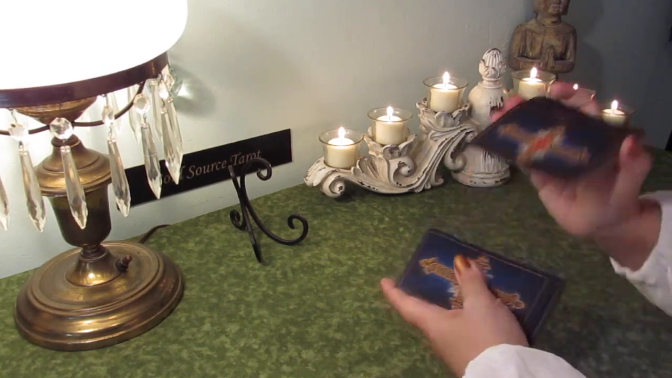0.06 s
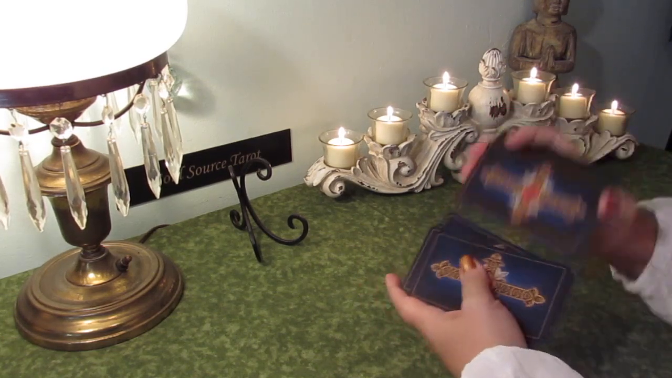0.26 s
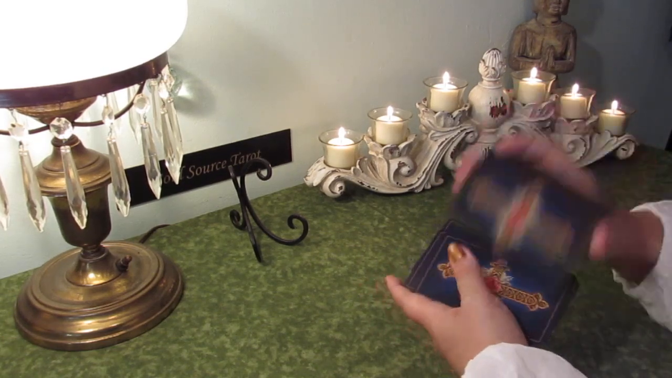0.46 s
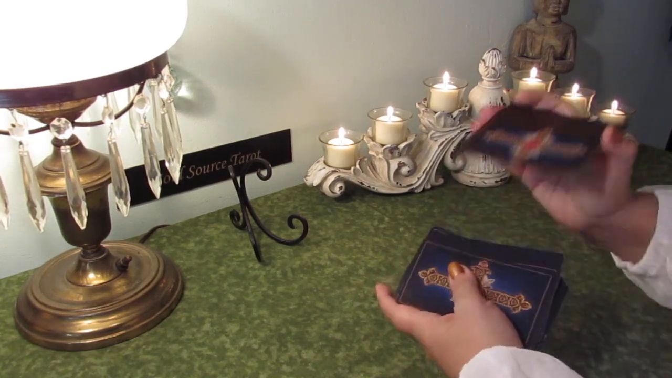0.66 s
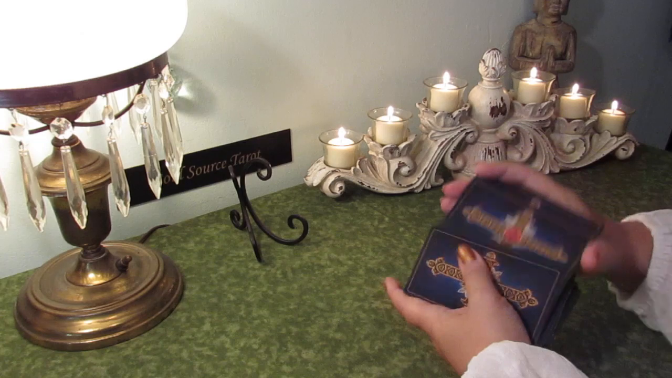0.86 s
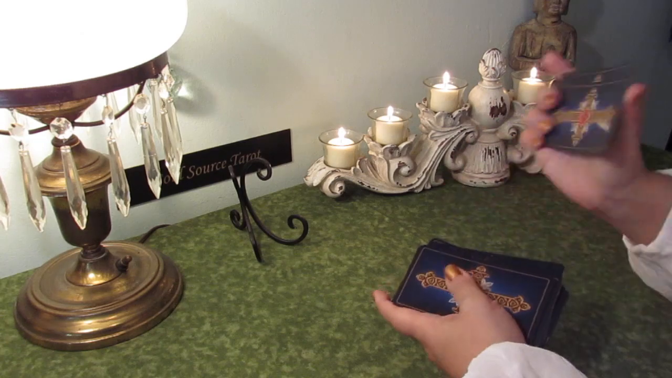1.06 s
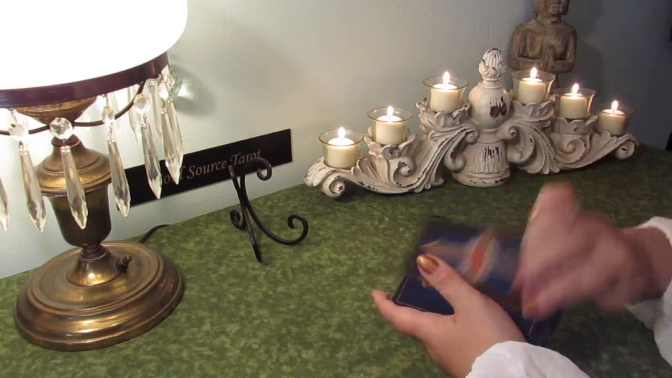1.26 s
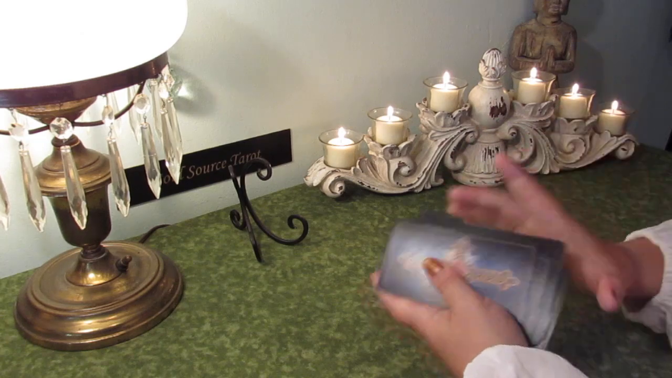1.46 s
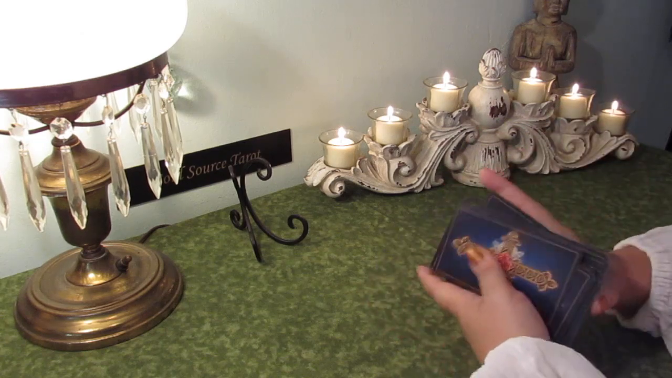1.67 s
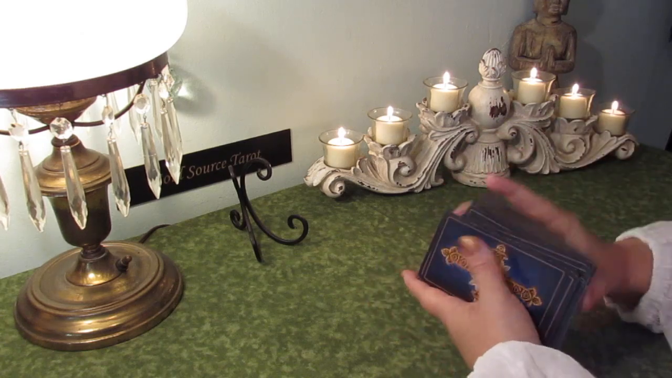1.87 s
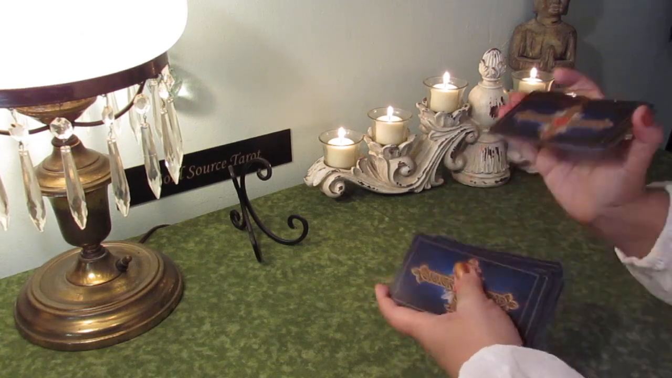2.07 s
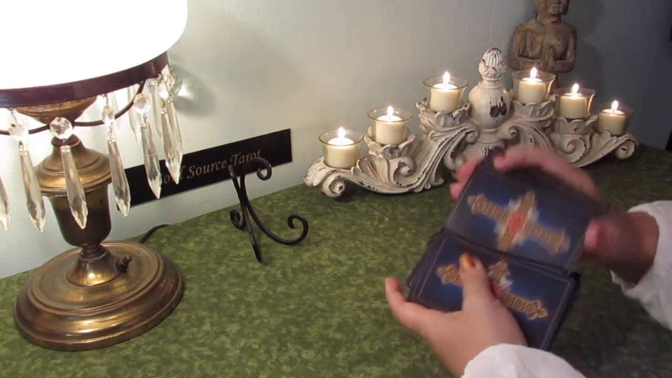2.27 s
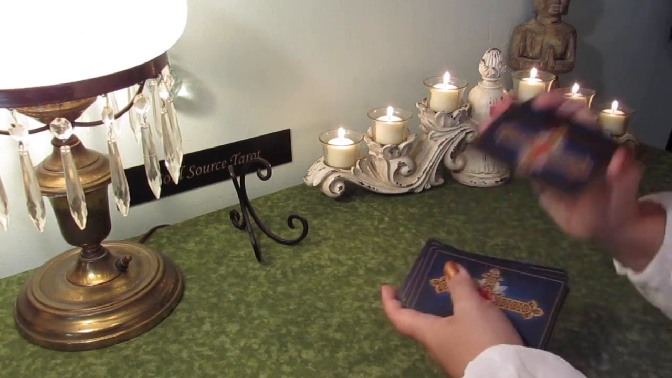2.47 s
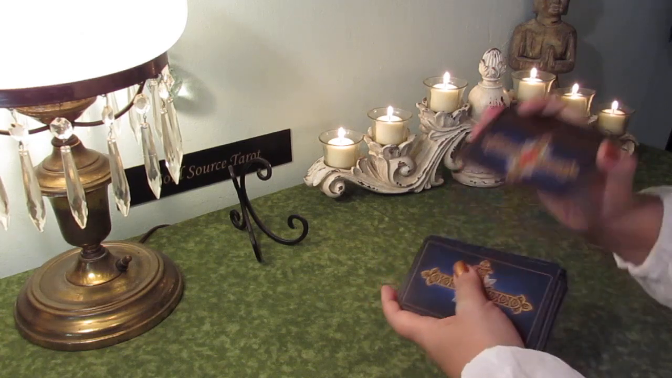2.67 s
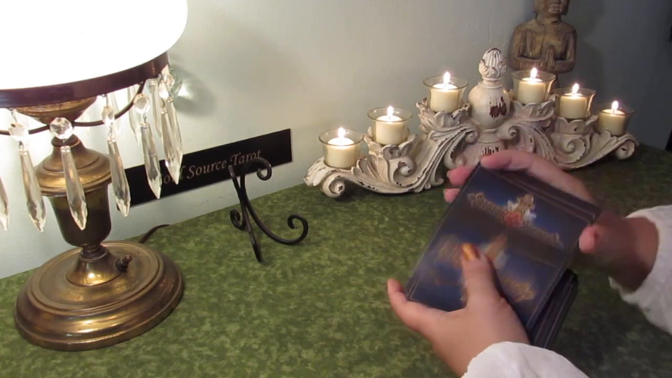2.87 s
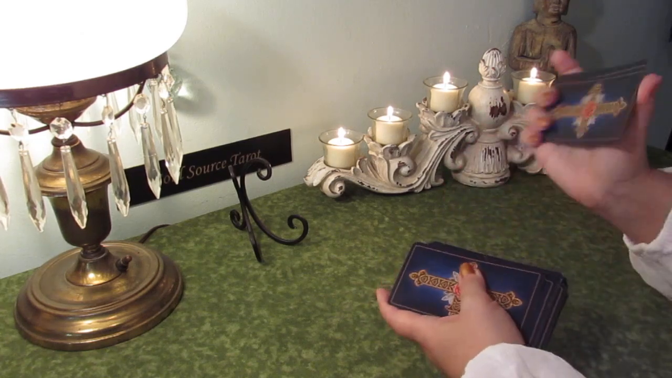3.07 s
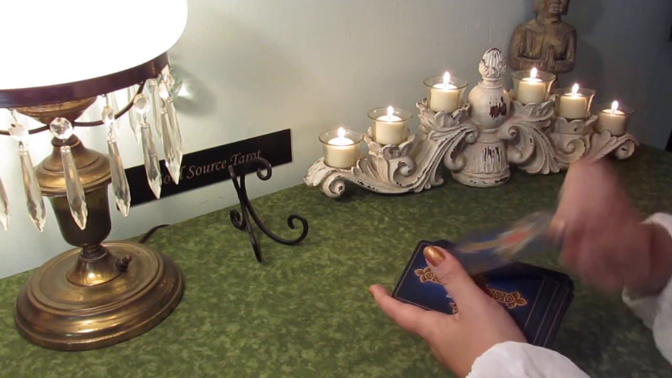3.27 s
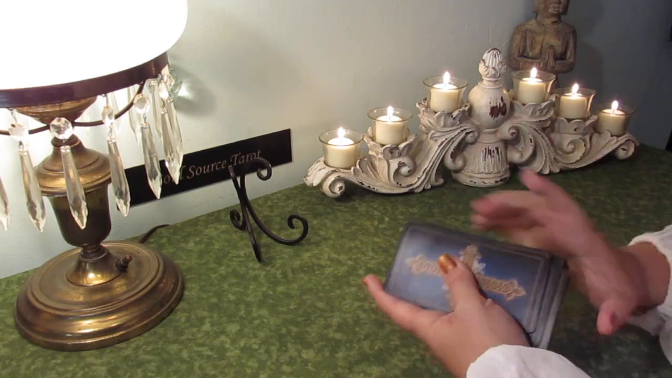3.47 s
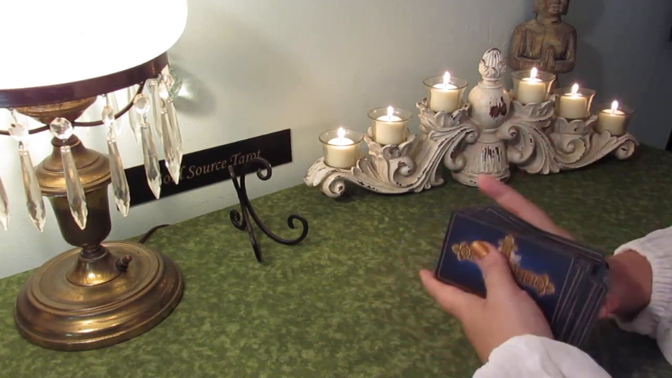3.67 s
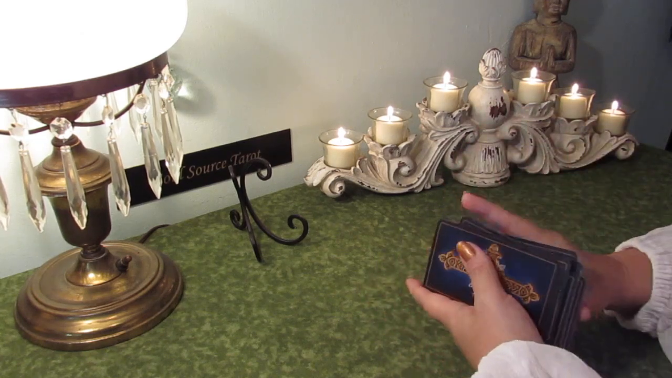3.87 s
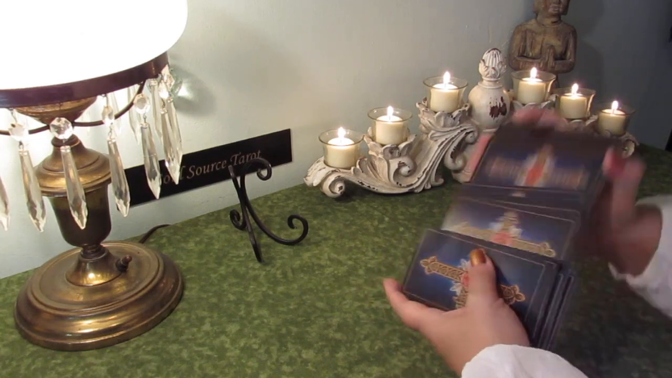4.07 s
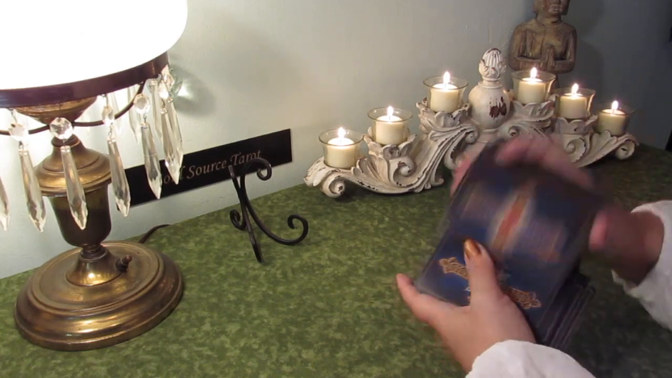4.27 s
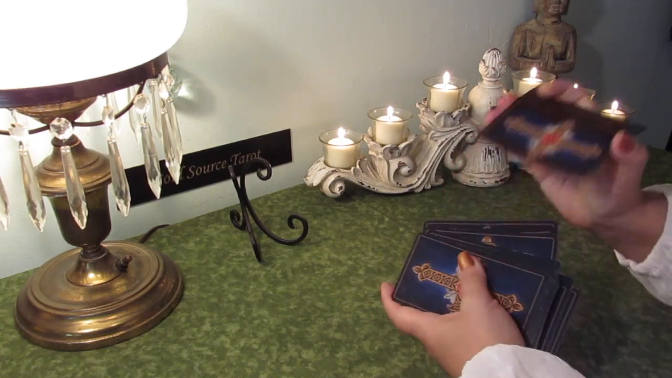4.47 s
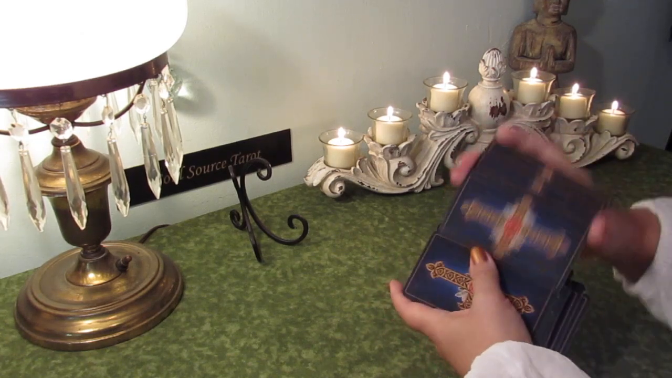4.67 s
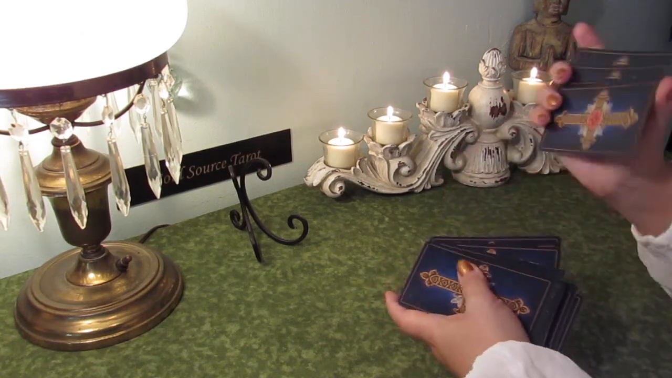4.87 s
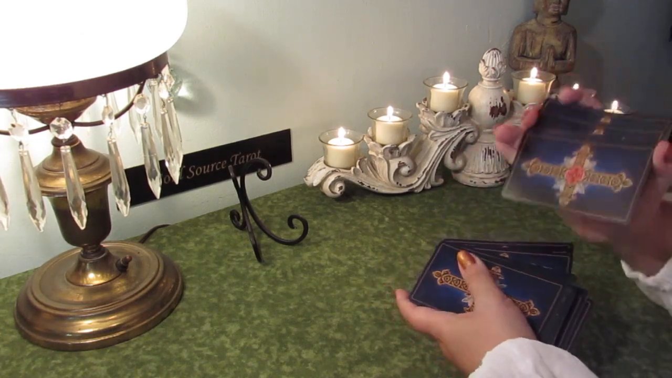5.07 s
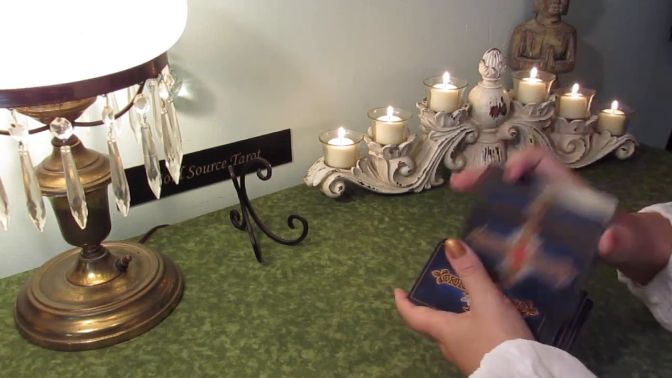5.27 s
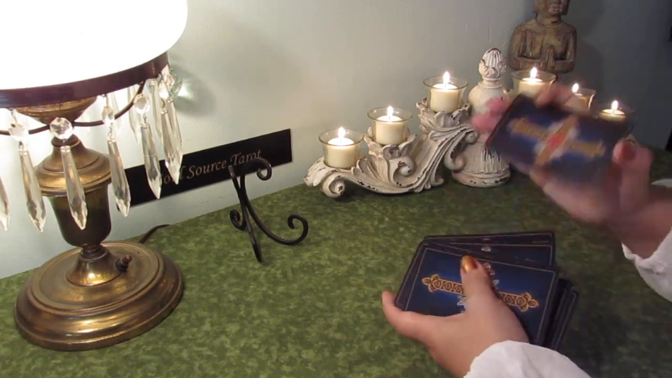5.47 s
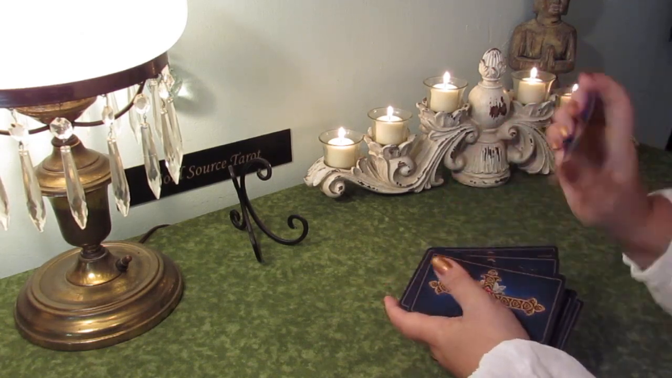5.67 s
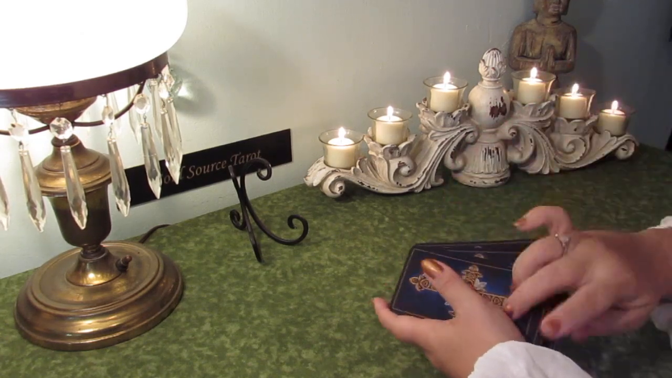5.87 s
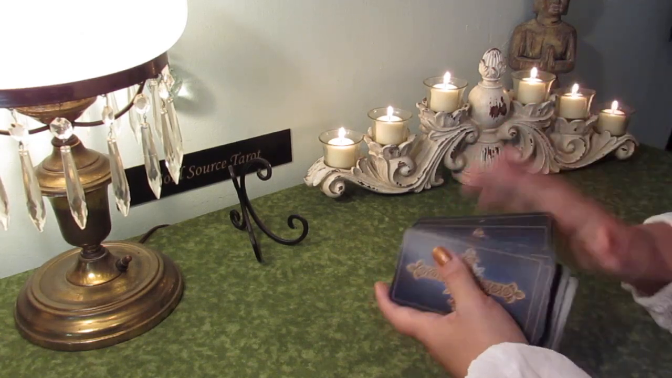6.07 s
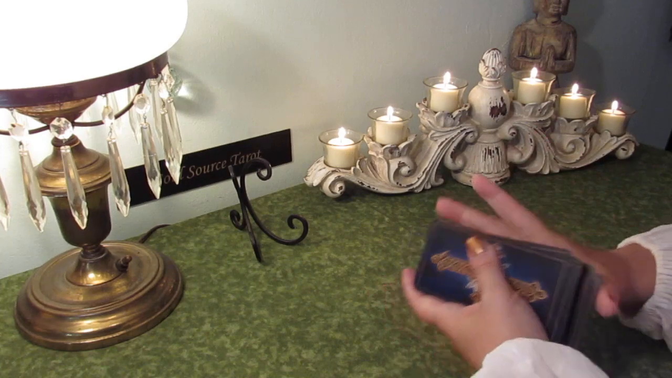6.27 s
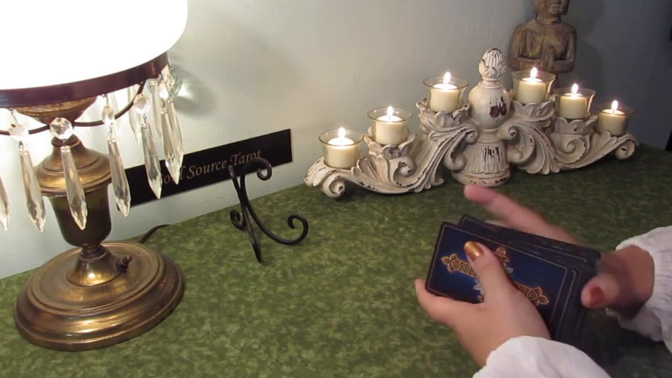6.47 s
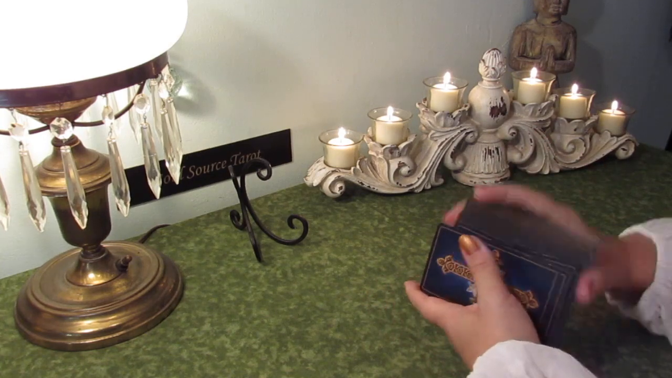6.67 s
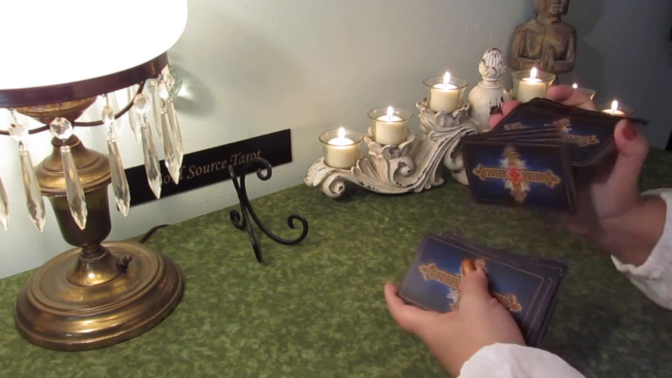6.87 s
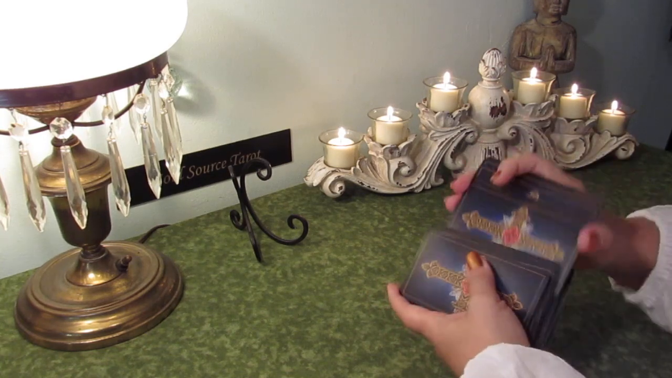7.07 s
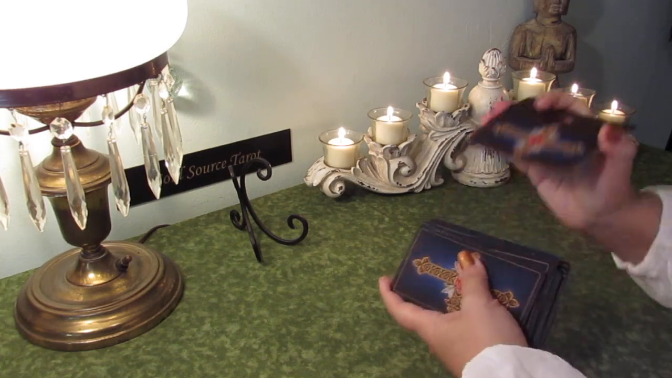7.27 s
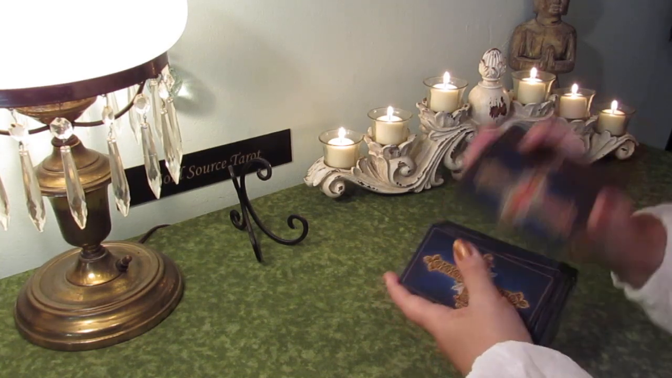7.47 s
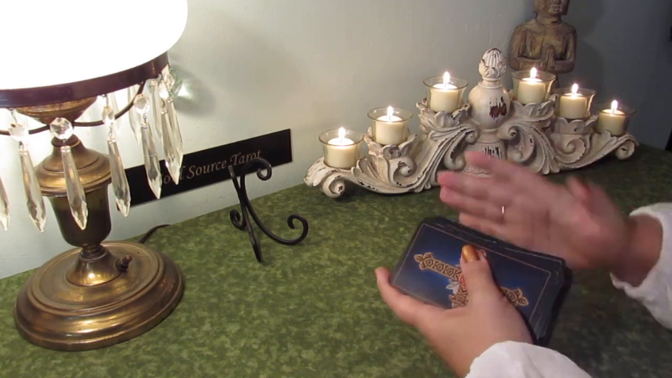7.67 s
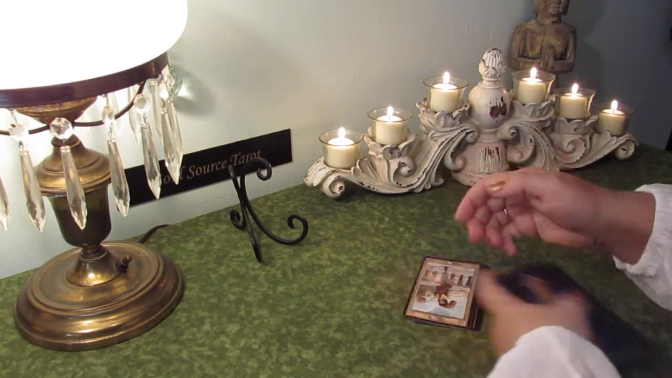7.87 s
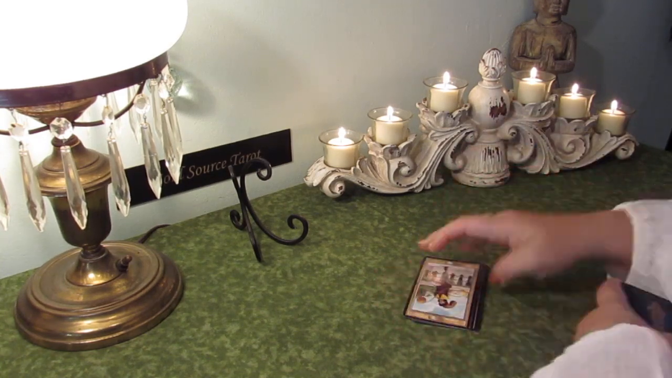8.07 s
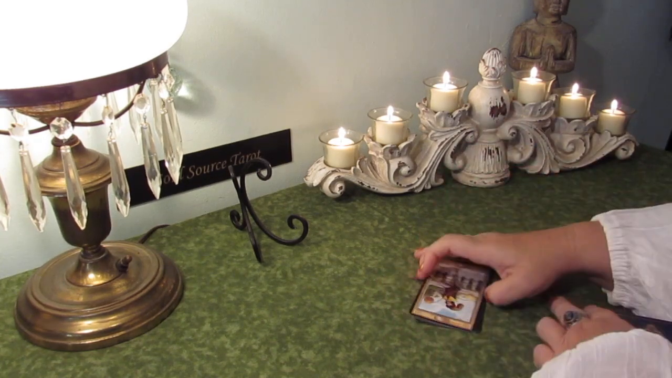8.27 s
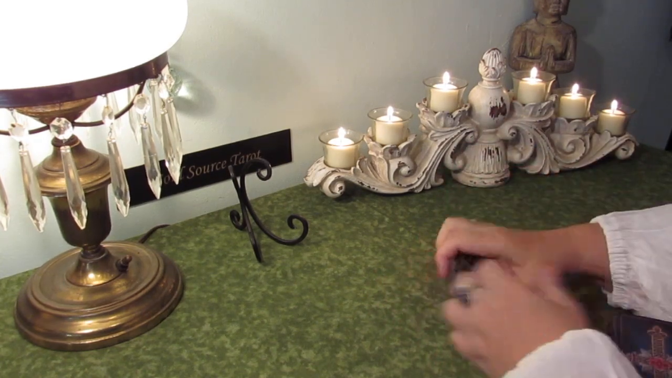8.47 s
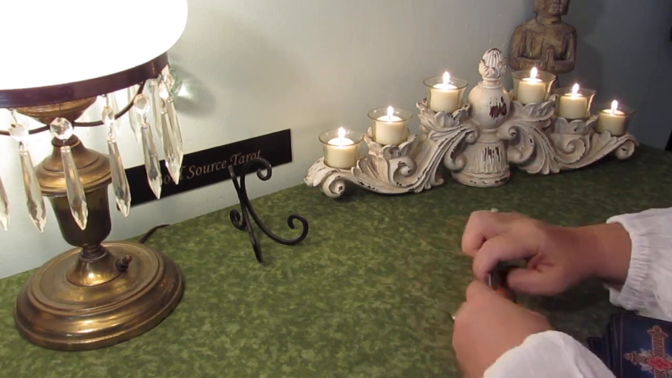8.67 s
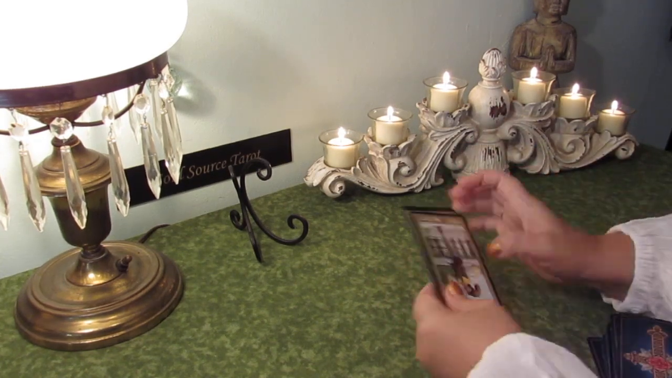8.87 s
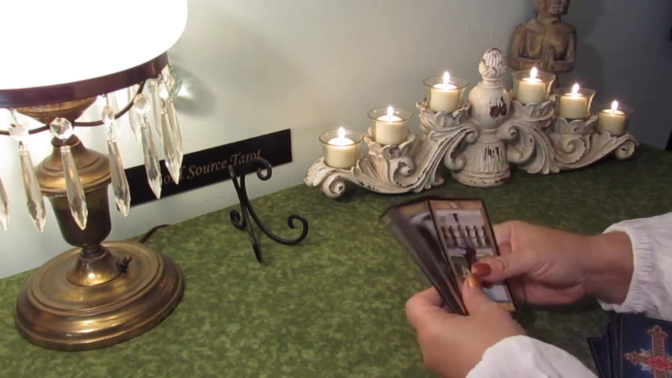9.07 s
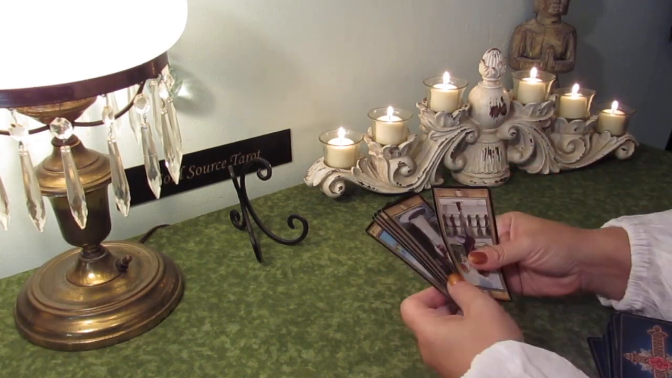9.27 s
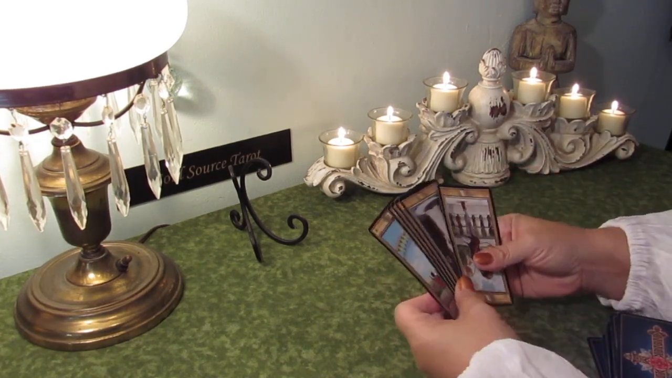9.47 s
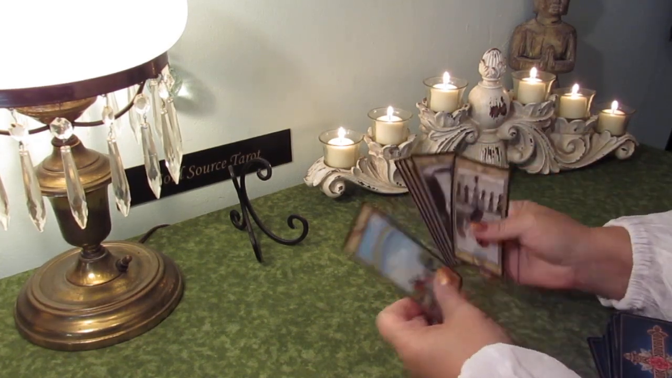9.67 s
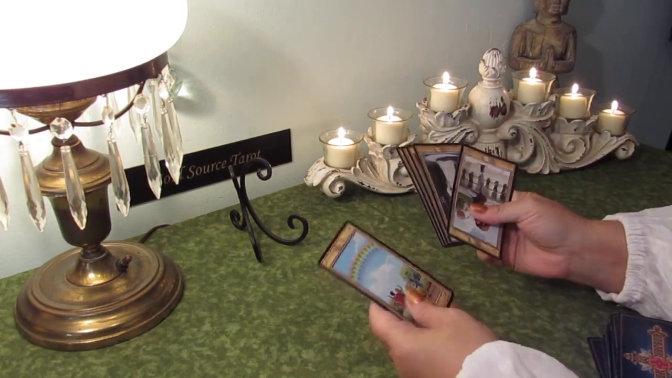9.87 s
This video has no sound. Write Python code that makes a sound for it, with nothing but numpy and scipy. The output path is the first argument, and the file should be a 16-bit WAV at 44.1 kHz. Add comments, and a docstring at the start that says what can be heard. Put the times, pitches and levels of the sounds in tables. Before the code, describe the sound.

A deck of large cards is shuffled hand over hand with crisp snaps and soft slides, then thumps dully onto a felt-covered table.

```python
"""A deck of large cards is shuffled hand over hand in a small room: packets slide, drop and snap together.
Each drop is a noise clap and patter that rings an air pocket, snaps the edges and thuds through the deck.
Later the deck and a hand thump on a felt-covered table, ringing its modes, and hands drag over the felt.
Birds chirp faintly far off as gliding whistles with a burr; room hum and hiss are coloured noise.
The room adds decaying noise echoes, widest in the treble; the hum spreads most in the bass."""
import sys
import numpy as np
from scipy import signal
from scipy.fft import rfft, irfft, next_fast_len
from scipy.io import wavfile
from scipy.ndimage import map_coordinates

SR = 44100
rng = np.random.default_rng(int(sys.argv[2]) if len(sys.argv) > 2 else 0)


def transcribe(u):
    """Save the signal u as a 16-bit wav file named by the first command-line argument.

    u: samples, shape (n,) or (channels, n), limited to [-1, 1]; the rate is SR.
    q: integer samples, one column per channel.
    """
    v = np.clip(np.atleast_2d(u).T, -1, 1)
    q = np.round(v * 32767).astype(np.int16)
    wavfile.write(sys.argv[1], SR, q)


N = 438353


def amp(db):
    """Gain of a level in dB."""
    return 10 ** (np.asarray(db) / 20)


def unit(x):
    """Scales x to rms 1."""
    return x / np.sqrt(np.mean(x ** 2) + 1e-20)


def unit_energy(x):
    """Scales x, along its last axis, to total energy 1."""
    return x / np.linalg.norm(x, axis=-1, keepdims=True)


def along(points, hz):
    """Reads a curve of (pitch_hz, value) points on a log pitch axis."""
    point_hz, value = np.transpose(points)
    return np.interp(np.log(hz + 1), np.log(point_hz + 1), value)


def wobble(rate, count=N):
    """A smooth random curve through rate random knots a second."""
    knots = rng.standard_normal(int(count * rate / SR) + 4)
    return map_coordinates(knots, [np.arange(count) * rate / SR])


def coloured(x, spectrum):
    """Filters x causally, at minimum phase, to a (pitch_hz, level_db) spectrum."""
    m = next_fast_len(2 * (x.shape[-1] // 2) + 8192)
    level_db = np.maximum(along(spectrum, np.fft.rfftfreq(m, 1 / SR)), -80)
    # folding the cepstrum onto positive time makes the filter causal
    cepstrum = irfft(np.log(amp(level_db)), m)
    cepstrum[1:m // 2] *= 2
    cepstrum[m // 2 + 1:] = 0
    return irfft(rfft(x, m) * np.exp(rfft(cepstrum)), m)[..., :x.shape[-1]]


def gritty(count, grain_db, rate):
    """Noise of rms 1 whose strength varies from grain to grain."""
    return unit(rng.standard_normal(count) * amp(grain_db * wobble(rate, count=count)))


def peak(x, pitch_hz, sharpness):
    """Rings x through one resonance."""
    b, a = signal.iirpeak(pitch_hz, sharpness, SR)
    return signal.lfilter(b, a, x)


def add(track, start_s, sound):
    """Mixes a sound into a track at start_s."""
    part = track[max(round(start_s * SR), 0):][:len(sound)]
    part += sound[:len(part)]


# Room hum and hiss, centre: pitch_hz, relative level_db
HUM_MID_SPECTRUM = [(12, -65), (20, -37), (49, -8), (162, -3.5), (405, -10), (441, -9.5), (479, -5.5),
                    (599, -6), (651, -24.5), (728, -14), (1420, -20), (3460, -27.5), (3980, -28.5),
                    (13600, -31), (15600, -43)]
# Room hum and hiss, width: pitch_hz, relative level_db
HUM_SIDE_SPECTRUM = [(12, -50), (20, -19), (70, -5), (181, -4.5), (239, -7), (405, -10.5), (441, -17),
                     (479, -9), (688, -30), (910, -19.5), (1930, -36.5), (14300, -46), (15600, -40)]


def hum():
    """Steady room hum and microphone hiss: two independent noises as mid and side, swaying together in level."""
    mid = amp(-56.0) * unit(coloured(rng.standard_normal(N), HUM_MID_SPECTRUM))
    side = amp(-47.5) * unit(coloured(rng.standard_normal(N), HUM_SIDE_SPECTRUM))
    return np.array([mid, side]) * amp(.7 * wobble(3))


# Bird notes: start_s, length_s, first_pitch_hz, last_pitch_hz, level_db, burr_hz (random knots a second)
BIRD_NOTES = [(0.01, 0.045, 4860, 4800, -60, 1800), (0.102, 0.034, 4900, 4870, -60, 820),
              (0.068, 0.068, 6920, 7340, -71, 320), (0.332, 0.15, 4530, 4300, -66.5, 28),
              (0.338, 0.1, 4120, 4160, -68, 29), (.34, .12, 3830, 3900, -68, 22),
              (0.526, 0.06, 5800, 5200, -61, 530), (0.755, 0.074, 5500, 6100, -71, 480),
              (9.007, 0.12, 6250, 6400, -73, 240), (9.087, 0.39, 8190, 7770, -71.5, 17),
              (9.553, .1, 4700, 4650, -71.5, 350), (9.843, 0.06, 4850, 4750, -65.5, 670)]
STEADY_HZ = 50  # a burr slower than this barely breaks the whistle


def birds():
    """Faint gliding whistles; a random burr flutters the strength and so blurs the pitch."""
    out = np.zeros(N)
    for start_s, length_s, first_hz, last_hz, level_db, burr_hz in BIRD_NOTES:
        u = np.linspace(0, 1, round(length_s * SR))
        pitch_hz = first_hz + (last_hz - first_hz) * np.sqrt(u)
        whistle = np.sin(2 * np.pi * np.cumsum(pitch_hz) / SR)
        flutter = unit(STEADY_HZ / burr_hz + wobble(burr_hz, count=len(u)))
        swell = np.sqrt(2 * np.sin(np.pi * u ** 0.43))
        add(out, start_s, amp(level_db) * flutter * swell * whistle)
    return out


# Cards rubbing face on face: middle_s, length_s, level_db
CARD_SLIDES = [(0.252, 0.1, -48), (0.592, 0.097, -46.5), (1.15, 0.36, -61), (1.328, 0.24, -54.5),
               (1.997, 0.26, -63.5), (2.684, 0.055, -48), (3.13, 0.072, -54), (3.22, 0.19, -64),
               (3.683, 0.1, -60), (3.748, 0.076, -61.5), (4.128, 0.13, -58), (4.401, 0.17, -55),
               (4.887, 0.062, -55), (5.387, 0.11, -53.5), (5.458, 0.034, -52), (5.623, 0.11, -63.5),
               (5.763, 0.4, -62), (5.907, 0.052, -53), (6.187, 0.043, -46.5), (6.449, 0.094, -52.5),
               (6.85, 0.51, -63), (6.885, 0.033, -51.5), (7.115, 0.25, -51), (8.144, 0.1, -64),
               (8.26, 0.2, -59), (8.403, 0.46, -65.5), (8.65, 0.36, -66.5), (8.865, 0.042, -54),
               (9.182, 0.14, -58), (9.502, 0.2, -60.5), (9.723, 0.23, -61.5)]
# Hiss of the rubbing faces: pitch_hz, relative level_db
RUB_SPECTRUM = [(410, -50), (700, -21), (955, -21), (1060, -3), (1450, -10.5), (3630, -9), (7500, -7.5),
                (13800, -11), (15500, -24)]


def slides():
    """Card faces rub together: gritty hiss in smooth, slightly uneven strokes."""
    stroke = np.zeros(N)
    for middle_s, length_s, level_db in CARD_SLIDES:
        add(stroke, middle_s - length_s / 2, amp(level_db) * np.hanning(round(length_s * SR)))
    hiss = unit(coloured(gritty(N, grain_db=2.5, rate=500), RUB_SPECTRUM))
    return stroke * amp(1.5 * wobble(60)) * hiss


# Packets landing: start_s, level_db (before layer gains), pocket_hz,
# snap_db and thud_db (added to level_db, before layer gains), settle_s
PACKET_DROPS = [(0.2346, -21, 1650, -5, -18, 0.046), (.3036, -34.5, 1830, 3.5, -13, 0.017),
                (.322, -27.5, 1550, -6, -20.5, 0.032), (0.5581, -52, 1620, 23.5, 8, 0.029),
                (0.689, -35, 1100, 0, -15.5, 0.0061), (.9096, -22, 2120, 8, -11, .026),
                (1.078, -47, 1390, 7, -13.5, 0.031), (1.104, -41, 3500, -5, -18, 0.032),
                (1.307, -34, 1820, -19, -6.5, 0.035), (1.3509, -29, 1920, 13, -1.5, 0.019),
                (1.64, -42.5, 1040, 6.5, -8.5, 0.064), (1.76, -39.5, 1390, -18, -14.5, 0.011),
                (2.0372, -39.5, 1350, 2.5, -13.5, 0.015), (2.2888, -27.5, 3020, -9, -12.5, 0.025),
                (2.2934, -22.5, 1740, 0.5, -10, 0.046), (2.615, -37, 2550, 9, -25, 0.015),
                (2.618, -29, 1140, -0.5, -4.5, .035), (2.7066, -40, 1460, 2, -12.5, 0.017),
                (2.927, -46, 1400, 20, 7.5, 0.066), (2.9702, -34, 2400, 9.5, -19, 0.018),
                (3.258, -42.5, 2460, 11, -27, .013), (3.325, -46, 1960, 18, -2.5, 0.034),
                (3.367, -39.5, 1970, 10.5, -2, 0.055), (3.381, -24.5, 980, -2.5, -5, 0.027),
                (3.788, -43, 1090, -19, -17, 0.02), (4.1659, -50, 1300, 5.5, -3, 0.024),
                (4.387, -19, 1430, -10, -23.5, 0.04), (4.4657, -46, 1900, -16, -8, 0.017),
                (4.6946, -38.5, 1510, 9.5, -4, 0.02), (4.872, -43.5, 2430, -7, -19, 0.018),
                (5.049, -48.5, 1800, 0, -17, .026), (5.2728, -49.5, 2550, -2, -22, .036),
                (5.3283, -42.5, 1480, 8, -25, .011), (5.408, -39.5, 1530, 7.5, 0.5, 0.062),
                (5.463, -47, 2630, -6, -4, 0.0095), (5.8479, -21, 1520, -35, -20.5, 0.019),
                (5.89, -33.5, 1800, -8, -19, .06), (5.9331, -43, 1800, 3.5, -10.5, 0.011),
                (6.16, -46, 1050, -1, -1.5, 0.044), (6.264, -37.5, 3300, 8, -17, 0.013),
                (6.526, -37.5, 1070, -28, -20, 0.02), (6.9507, -44.5, 1470, 3.5, -8, 0.029),
                (7.019, -34, 1490, 0.5, -19.5, .02), (7.055, -25, 1430, -3.5, -23, 0.029),
                (7.0652, -23.5, 1240, -5, -7, 0.046), (7.1281, -24, 2130, 0.5, -11.5, 0.014),
                (7.2658, -36.5, 1840, -8, -9, 0.049), (7.5773, -21.5, 1420, 11, -8, 0.019),
                (8.084, -50, 2100, -4, -12, .03), (8.262, -39, 1470, 7, -7.5, 0.017),
                (8.415, -38, 810, -23, -27, 0.027), (8.481, -34, 2800, -28, -23.5, 0.027),
                (8.576, -49, 1890, 10, -19, 0.023), (8.759, -44, 1200, 3.5, -12.5, 0.028),
                (8.838, -41, 1780, -1, -14.5, 0.02), (9.094, -51.5, 1900, -1, -18, .015),
                (9.1238, -41.5, 1160, -8, -22, 0.03), (9.7604, -32.5, 1300, 6, -10.5, .012)]
# Edge snap: pitch_hz, level_db before layer gain
SNAP_SPECTRUM = [(500, -22.5), (900, -12.5), (1500, -7), (2200, -9.5), (3000, -9), (5000, -7.5),
                 (7500, -7.5), (10000, -9), (14000, -18), (15500, -23.5)]
# Thud of the deck: pitch_hz, level_db before layer gain
THUD_SPECTRUM = [(60, -24), (130, 0.5), (250, 4.5), (540, 10), (720, -27.5), (1000, -22), (2000, -14)]
POCKET_DB, SNAP_DB, THUD_DB = 13, 22, 30  # gain of each layer
USUAL_THUD_DB, USUAL_SETTLE_S = -14, .03
POCKET_Q, DAMPING = 1.34, 1.08  # sharpness at a usual thud; dB of sharpness lost per dB of thud
Q_LEAST, Q_MOST = .7, 6.5
OVERTONE, OVERTONE_DB = 1.54, -13  # the pocket's second resonance: pitch ratio, level
CARD_OVER_POCKET, CARD_DB = 0.64, -10.5  # the stiff card's clack: pitch ratio, level
CLAP_DB = -11.5  # flat clap over patter, before the shifts below
CLAP_PER_THUD, CLAP_PER_SNAP = .55, .15  # dB of clap per dB of thud, of snap
CLAP_SLOW_DB = 5  # clap lost each time the settling time doubles


def drops():
    """A packet claps flat and its cards patter down, ringing the air pocket between them; edges snap, the deck thuds.
    A heavy packet claps harder and damps its pocket; a light one rings hollow."""
    pocket, edges, weight = np.zeros((3, N))
    t = np.arange(SR // 7) / SR
    puff = unit_energy(np.hanning(13))
    for start_s, level_db, pocket_hz, snap_db, thud_db, settle_s in PACKET_DROPS:
        heavy_db = thud_db - USUAL_THUD_DB
        clap_db = CLAP_DB + CLAP_PER_THUD * min(heavy_db, 6) + CLAP_PER_SNAP * min(snap_db, 6)
        clap_db -= CLAP_SLOW_DB * np.log2(settle_s / USUAL_SETTLE_S)
        sharpness = np.clip(POCKET_Q * amp(-DAMPING * heavy_db), Q_LEAST, Q_MOST)

        u = t / settle_s
        blow = unit_energy(u ** 1.28 * amp(-72 * u) * gritty(len(t), grain_db=3.0, rate=615))  # the patter
        add(blow, 0, -amp(clap_db) * puff)  # air squeezed out at once

        pocket_ring = peak(peak(blow, pocket_hz, sharpness), pocket_hz, sharpness)
        overtone = peak(blow, OVERTONE * pocket_hz, OVERTONE * sharpness)
        clack = peak(blow, CARD_OVER_POCKET * pocket_hz, .9)
        ring = unit_energy(pocket_ring)
        ring = ring + amp(OVERTONE_DB) * unit_energy(overtone) + amp(CARD_DB) * unit_energy(clack)

        add(pocket, start_s, amp(level_db) * ring)
        add(edges, start_s, amp(level_db + snap_db) * blow)
        add(weight, start_s, amp(level_db + thud_db) * blow)
    snap = amp(SNAP_DB) * coloured(edges, SNAP_SPECTRUM)
    thud = amp(THUD_DB) * coloured(weight, THUD_SPECTRUM)
    return amp(POCKET_DB) * pocket + snap + thud


# Blows on the table: start_s, level_db (before the mode levels), hardness_db (per octave)
TABLE_BLOWS = [(7.117, -36, -0.5), (7.276, -33, 1), (8.204, -26.5, 1), (8.219, -44, 4), (8.28, -21, -1.5),
               (8.329, -52, -5), (8.579, -46, -1), (8.691, -45, 2), (8.757, -40.5, -1)]
# Ringing modes of the table: pitch_hz, relative level_db, t60_s (time to fall 60 dB)
TABLE_MODES = [(101, -59, 0.012), (140, 11, 0.028), (230.5, -9, 0.29), (304, -2.5, 0.069), (375, 5, 0.054),
               (478.5, -0.5, 0.053), (570, -18, 0.14), (872, -5, 0.042), (1120, -5, 0.036)]
# Dull knock on the felt-covered table: pitch_hz, level_db before the blow's level
KNOCK_SPECTRUM = [(300, -32), (600, -20), (900, -6), (1500, -7.5), (3000, -21), (8000, -40)]
KNOCK_DB, KNOCK_PER_HARD = 1.5, 2.8  # dB of knock over the blow's level; dB more per unit of hardness


def thumps():
    """A blow rings the table's low modes at new strengths, with a short dull knock; harder blows favour upper modes."""
    ringing, knock = np.zeros((2, N))
    t = np.arange(SR // 3) / SR
    onset = 1 - np.exp(-t / 0.0027)
    for start_s, level_db, hard_db in TABLE_BLOWS:
        ring = np.zeros(len(t))
        for pitch_hz, mode_db, t60_s in TABLE_MODES:
            strength_db = mode_db + hard_db * np.log2(pitch_hz / 250) + rng.normal(0, 2)
            ring += amp(strength_db - 60 * t / t60_s) * np.sin(2 * np.pi * pitch_hz * t)
        add(ringing, start_s, amp(level_db) * ring * onset)
        knock_db = level_db + KNOCK_DB + KNOCK_PER_HARD * hard_db - 60 * t / 0.11
        add(knock, start_s, amp(knock_db) * gritty(len(t), grain_db=5.5, rate=370))
    return ringing + coloured(knock, KNOCK_SPECTRUM)


# Hands dragging on the felt, a level curve: time_s, level_db
HAND_LEVELS = [(8.3, -58), (8.39, -55.5), (8.47, -55), (8.57, -67), (8.62, -56), (8.72, -61), (8.8, -62),
               (8.9, -64.5), (9.0, -78)]
# Rumble of the felt: pitch_hz, relative level_db
FELT_SPECTRUM = [(71, -31), (120, -4), (280, -3), (536, -4.5), (700, -21), (1010, -10.5), (2750, -21.5),
                 (3500, -42), (4550, -75), (7700, -120)]


def hands():
    """Hands drag over the felt: a low, unsteady rumble of noise."""
    time_s, level_db = np.transpose(HAND_LEVELS)
    drag_db = np.interp(np.arange(N) / SR, time_s, level_db, left=-120, right=-120)
    rumble = unit(coloured(rng.standard_normal(N), FELT_SPECTRUM))
    return amp(drag_db) * amp(3.5 * wobble(35)) * rumble


# Echo decay: pitch_hz, t60_s (time to fall 60 dB)
ECHO_DECAY = [(100, 0.2), (400, 0.27), (2000, 0.21), (10000, 0.21)]
# Side over mid of the echoes: pitch_hz, level_db
ECHO_WIDTH = [(100, -9), (300, -18), (1000, -8), (2500, -35.5), (5000, -12.5), (9000, 1), (15000, 2.5)]


def room(x, wet_db, turn_rate, count):
    """Mid and side echoes; the moving source throws its sound along several paths by turns, each with its own tail."""
    share = np.array([wobble(turn_rate) for _ in range(count)])
    share = share / np.linalg.norm(share, axis=0)  # the paths' powers always sum to 1
    noise = rng.standard_normal((2, count, SR // 3))
    hz, t, grid = signal.stft(noise, SR, nperseg=128)
    decay = amp(-60 * t / along(ECHO_DECAY, hz)[:, None])
    tail = unit_energy(signal.istft(grid * decay, SR, nperseg=128)[1])
    m = next_fast_len(N + SR // 2)
    delayed = np.pad(x, (200, 0))[:N]  # in samples
    paths = rfft(share * delayed, m)
    mid, side = irfft((paths * rfft(tail, m)).sum(axis=1), m)[:, :N]
    return amp(wet_db) * np.array([mid, coloured(side, ECHO_WIDTH)])


# Echoes off the nearest surfaces: delay_s, level_db
NEAR_SURFACES = [(.0061, -17), (.0072, -20), (0.0131, -11.5)]


def slapback(x):
    """The nearest surfaces return a few early, delayed copies."""
    return sum(amp(level_db) * np.pad(x, (round(delay_s * SR), 0))[:N] for delay_s, level_db in NEAR_SURFACES)


# Small near sources radiate little bass: pitch_hz, level_db
NEAR_BASS = [(20, -12), (60, -7.5), (110, 3), (15000, -0.5)]


def scene():
    """Near sounds sit close to the middle, birds lean left; echoes and hum spread."""
    cards = coloured(drops() + slides() + hands(), NEAR_BASS)
    table = coloured(thumps(), NEAR_BASS)
    far = birds()
    near = cards + table
    slap = slapback(cards)
    card_echo = room(cards, wet_db=-3.0, turn_rate=90, count=3)
    # the table and the birds echo through the room too, their paths turning slowly
    other_echo = room(table + far, wet_db=-3.5, turn_rate=12, count=2)
    mid, side = card_echo + other_echo + hum()
    mid = mid + near + slap + far
    side = side + coloured(slap, ECHO_WIDTH) - 0.075 * near + 0.13 * far
    return np.array([mid + side, mid - side])


TOP_HZ = 15300


def record(dry):
    """A sharp band limit removes everything from TOP_HZ up."""
    m = next_fast_len(N + 4096)
    kept = np.fft.rfftfreq(m, 1 / SR) < TOP_HZ
    return irfft(rfft(dry, m) * kept, m)[:, :N]


dry = scene()
out = record(dry)
transcribe(out)
```